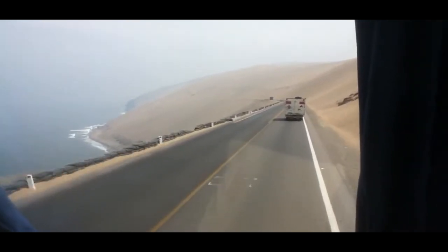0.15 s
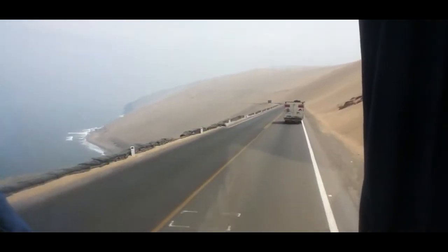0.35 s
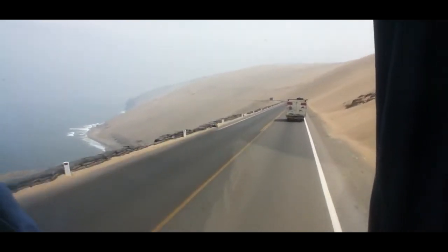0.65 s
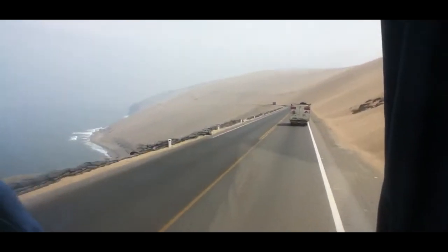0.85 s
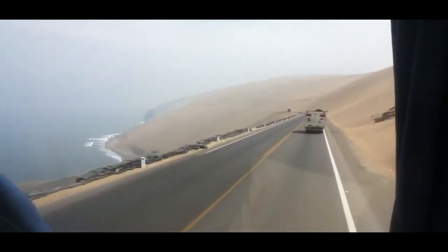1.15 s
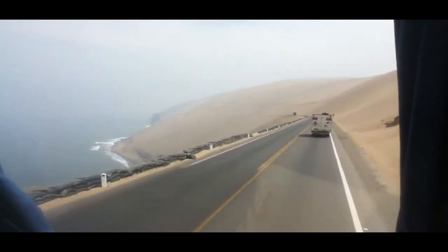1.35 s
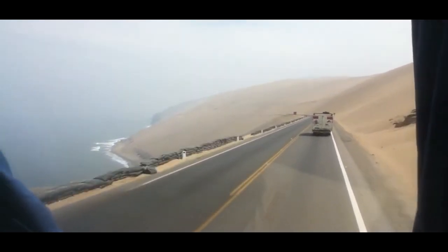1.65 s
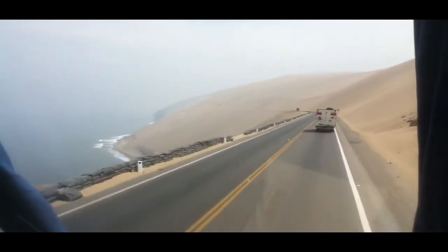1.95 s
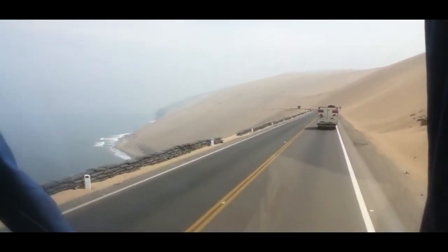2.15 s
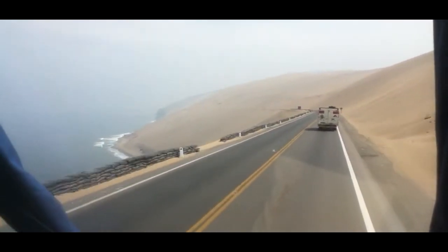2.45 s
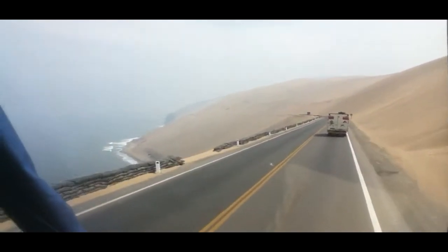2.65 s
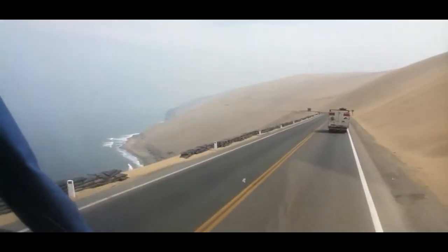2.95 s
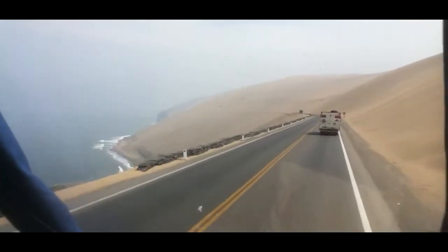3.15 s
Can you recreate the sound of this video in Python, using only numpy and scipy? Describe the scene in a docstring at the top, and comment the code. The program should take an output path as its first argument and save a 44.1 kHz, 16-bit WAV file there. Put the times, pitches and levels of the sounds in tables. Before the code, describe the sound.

A low, steady road rumble fills a moving bus, heard from a front seat. Loose fittings clack and a panel knocks nearby, then bumps make the cabin boom, over tyre and wind roar and a faint engine hum.

```python
"""A low road rumble fills the cabin of a bus cruising along a coast road, heard from a front seat.
Tyres and wind rumble through the body, and bumps set the cabin booming. The engine hums underneath,
with a drivetrain whine that creeps up in pitch as the bus gains speed. Around the microphone,
loose fittings clack, chatter and snap and a panel knocks as the road shakes them."""
import sys
import numpy as np
from scipy.fft import rfft, irfft, next_fast_len
from scipy.io import wavfile
from scipy.ndimage import map_coordinates

SR = 44100
rng = np.random.default_rng(int(sys.argv[2]) if len(sys.argv) > 2 else 0)


def to_wav(sig):
    """Store sig (one row per channel, or 1-D mono) as 16-bit WAV at the path in sys.argv[1].

    Samples outside -1..1 are clipped; the rate is SR.
    """
    pcm = np.clip(np.atleast_2d(sig), -1, 1) * 32767
    pcm = np.round(pcm).astype(np.int16)
    wavfile.write(sys.argv[1], SR, pcm.T)  # frames by channels


N = 145530


def amp(db):
    """Decibels to gain."""
    return 10 ** (np.asarray(db) / 20)


def unit(x):
    """Scale to rms 1."""
    return x / np.sqrt(np.mean(x ** 2) + 1e-20)


def curve(rows):
    """One value per sample from (s, value) rows."""
    return np.interp(np.arange(N) / SR, *np.transpose(rows))


def wobble(rate):
    """A smooth random curve, rate knots a second."""
    return map_coordinates(rng.standard_normal(int(N * rate / SR) + 4), [np.arange(N) * rate / SR])


def filtered(x, response):
    """x times a response of frequency."""
    m = next_fast_len(N + 8192)
    return irfft(rfft(x, m) * response(np.fft.rfftfreq(m, 1 / SR)), m)[:N]


def noise(spectrum, resonances=()):
    """Noise of rms 1 with a broad colour and narrow resonances on top."""
    f, db = np.transpose(spectrum)
    colour = lambda hz: np.interp(np.log(hz + 1), np.log(f + 1), db)
    lift = lambda hz: sum(d / (1 + (2 * (hz - c) / w) ** 2) for c, w, d in resonances)
    return unit(filtered(rng.standard_normal(N), lambda hz: amp(colour(hz) + lift(hz))))


def blow(start, rise, t60):
    """Envelope of a blow: quick rise, exponential decay."""
    t = np.maximum(np.arange(N) / SR - start, 0)
    return (1 - np.exp(-t / rise)) * np.exp(-np.minimum(np.log(1000) * t / t60, 20))


# drivetrain whine, following the engine speed: time_s, pitch_hz
WHINE_PITCH_CURVE = [(0, 232.5), (.65, 233.2), (.9, 234.1), (1.4, 234.1), (1.7, 235.1), (2.2, 235.8),
                     (2.5, 236.7), (2.85, 236.7), (3.3, 237.8)]
# partials of the whine: harmonic_number, level_db
WHINE_PARTIALS = [(1, -41.5), (2, -47)]
# engine hum at the seat: time_s, level_db
HUM_LEVELS = [(0, -32), (.9, -39), (1.25, -46), (1.9, -61), (2.25, -32), (2.7, -33), (3.0, -39), (3.3, -37)]

def engine(hum_ratio=.294, waver_db=1.5, waver_per_s=4):
    """Engine hum and drivetrain whine rise in pitch together with the speed, each wavering in level."""
    whine_cycles = np.cumsum(curve(WHINE_PITCH_CURVE)) / SR

    def tone(ratio):
        waver = amp(waver_db * wobble(waver_per_s))
        return unit(waver * np.sin(2 * np.pi * (ratio * whine_cycles + rng.random())))

    hum = amp(curve(HUM_LEVELS)) * tone(hum_ratio)
    whine = sum(amp(db) * tone(harmonic) for harmonic, db in WHINE_PARTIALS)
    return hum + whine


# loose fittings striking around the cabin: start_s, click_db, knock_db, t60_s
FITTING_CLACKS = [(0.061, -43, -45, 0.078), (0.066, -50, -41, 0.14), (0.128, -50, -57, 0.025),
                  (.199, -49.5, -60, .03), (.298, -48, -44, 0.028), (0.5, -48, -49, 0.051),
                  (0.531, -47.5, -64, 0.12), (0.565, -55, -44, 0.06), (0.778, -51, -51, 0.11),
                  (0.83, -48, -54, 0.026), (.871, -53, -66, 0.093), (0.895, -38, -36, 0.041),
                  (0.902, -38.5, -36.5, 0.092), (1.027, -41.5, -43, 0.11), (1.066, -35.5, -57, 0.053),
                  (1.070, -43.5, -59, 0.12), (1.288, -48, -57, .05), (1.33, -48.5, -39, 0.12),
                  (1.456, -55, -41, 0.15), (1.934, -47, -60, .06), (1.974, -44.5, -47, .06),
                  (2.445, -45, -60, 0.064), (2.4515, -42, -35.5, 0.075), (2.648, -54, -43, .05),
                  (2.826, -51, -64, .06), (2.9965, -40.5, -35, 0.06)]
# colour of a clack's sharp click: frequency_hz, relative_db
CLICK_SPECTRUM = [(600, -18), (2000, -1), (3300, 1.5), (4400, 0.5), (5500, 0), (7500, -2), (10000, -2.5),
                  (12500, -13)]
# colour of its hollow knock: frequency_hz, relative_db
KNOCK_SPECTRUM = [(200, -46), (500, 0), (1100, 2), (1700, -1), (2600, -3.5), (4000, -11), (9000, -70)]
# resonances of the fittings, also heard in the snaps: centre_hz, width_hz, lift_db
FITTING_RESONANCES = [(1040, 230, 6), (1710, 520, 3), (2510, 290, -2.5), (5320, 780, 1.5), (7000, 240, 1.5)]
# fittings rubbing: middle_s, half_length_s, level_db
FITTING_SCUFFS = [(0.383, 0.028, -57), (0.952, 0.019, -53), (1.014, 0.018, -56.5), (1.96, 0.024, -57),
                  (2.91, 0.014, -59)]

def rattles(rise_s=.0012, chatter_db=1.5, chatter_per_s=430, ticks_per_s=9):
    """Loose fittings strike, chatter briefly and rub; the trim ticks faintly at random."""
    t = np.arange(N) / SR
    bright = noise(CLICK_SPECTRUM, FITTING_RESONANCES)
    hollow = noise(KNOCK_SPECTRUM, FITTING_RESONANCES)
    chatter = unit(amp(chatter_db * wobble(chatter_per_s)))
    click_power, knock_power = np.zeros(N), np.zeros(N)
    for start, click_db, knock_db, t60 in FITTING_CLACKS:
        strike = blow(start, rise_s, t60)
        click_power += (amp(click_db) * strike) ** 2
        knock_power += (amp(knock_db) * strike) ** 2
    for middle, half_length, db in FITTING_SCUFFS:
        click_power += amp(db) ** 2 * np.exp(-((t - middle) / half_length) ** 2)
    for when, softness in rng.random((int(ticks_per_s * N / SR), 2)):
        tick_db = -63 - 2 * np.log(softness + 0.21)  # many faint ticks, a few stronger
        click_power += (amp(tick_db) * blow(when * N / SR, rise_s, t60=.05)) ** 2
    return chatter * (np.sqrt(click_power) * bright + np.sqrt(knock_power) * hollow)


# snaps inside the hardest clacks: start_s, level_db
CATCH_SNAPS = [(0.062, -39), (1.976, -40), (2.4538, -28.5), (2.4572, -33), (2.996, -31)]
# their colour: frequency_hz, relative_db
SNAP_SPECTRUM = [(400, -15), (1300, -5), (3300, 16.5), (4400, -4), (5500, 15), (6600, 3), (8000, -48),
                 (12500, -38)]

def snaps():
    """A hard catch snaps home with a dry, bright ring."""
    envelope = sum(amp(db) * blow(start, rise=.00043, t60=.016) for start, db in CATCH_SNAPS)
    return envelope * noise(SNAP_SPECTRUM, FITTING_RESONANCES)


# a loose panel knocking in the cabin: start_s, level_db, rise_s, t60_s
PANEL_STRIKES = [(.065, -39, .001, .03), (.383, -31, .005, .06), (.674, -32, .005, .05),
                 (.903, -21.5, .0012, .03), (1.331, -35, .002, .05)]
# its modes: pitch_hz, relative_db
PANEL_MODES = [(1090, -4.5), (1215, -4.5), (1660, -16), (2510, -13)]

def panel(pitch_spread=.015):
    """A loose panel rings briefly in its few modes, their pitches shifting a little at each knock."""
    t = np.arange(N) / SR
    knocks = np.zeros(N)
    for start, db, rise, t60 in PANEL_STRIKES:
        strike = blow(start, rise, t60)
        for mode_hz, mode_db in PANEL_MODES:
            pitch_hz = mode_hz * (1 + rng.normal(0, pitch_spread))
            knocks += amp(db + mode_db) * strike * np.sin(2 * np.pi * (pitch_hz * t + rng.random()))
    return knocks


# cabin booms on bumps in the road: start_s, level_db, pitch_hz
CABIN_BOOMS = [(0.858, -18.5, 81.5), (1.592, -11, 75), (1.867, -16, 96), (2.17, -9, 73.4),
               (2.638, -15, 74.5)]

def bumps(rise_s=.018, t60_s=.17):
    """Each bump sets the cabin around the microphone booming for a few cycles."""
    t = np.arange(N) / SR
    return sum(amp(db) * blow(start, rise_s, t60_s) * np.sin(2 * np.pi * hz * (t - start))
               for start, db, hz in CABIN_BOOMS)


# deep shudder of the bus body: time_s, level_db
SHUDDER_LEVELS = [(0, -34.5), (.4, -37), (.55, -29.5), (.9, -37), (1.1, -38.5), (1.45, -35), (1.7, -34.5),
                  (2.05, -39), (2.45, -36), (2.7, -30.5), (2.93, -46), (3.2, -42), (3.3, -22.5)]
# its colour: frequency_hz, relative_db
SHUDDER_SPECTRUM = [(8, -30), (17, -9), (28, -9), (36, -10), (43.5, 1), (52, -5.5), (70, -17), (110, -54),
                    (300, -120)]
# road rumble at the seat: time_s, relative_db
RUMBLE_LEVELS = [(0, -25), (.2, -25), (.42, -28), (.87, -24), (1.1, -26.5), (1.6, -26.5), (1.8, -25),
                 (1.87, -23), (1.98, -29), (2.03, -26), (2.25, -24), (2.52, -27), (2.58, -28),
                 (2.63, -25.5), (2.85, -24.5), (3.1, -29), (3.2, -24.5), (3.3, -30)]
# its colour: frequency_hz, relative_db
RUMBLE_SPECTRUM = [(20, -45), (45, -32), (60, -4.5), (73, 0.5), (100, -2), (125, -6), (155, -6.5),
                   (195, -10), (228, -7.5), (255, -12.5), (290, -22), (450, -40.5), (1000, -120)]
# cabin resonances lifting the rumble: centre_hz, width_hz, lift_db
CABIN_RESONANCES = [(76.5, 19, 1), (98, 34, 2.5), (134.2, 13.6, 5.5), (179, 5.3, 3.5), (202, 5.2, 4.5),
                    (275, 11, 4)]
# roar of tyres and wind, heard from inside: time_s, level_db
ROAR_LEVELS = [(0, -38.5), (.6, -39), (.92, -38.5), (1.2, -39), (2.0, -38.5), (2.6, -38), (3.3, -39.5)]
# its colour: frequency_hz, relative_db
ROAR_SPECTRUM = [(150, -46), (290, -2), (380, 2), (520, -2), (660, -3.5), (850, -8.5), (1100, -10),
                 (1400, -14), (1700, -16), (2500, -23), (4000, -29), (9000, -37.5)]
# thin hiss of air: frequency_hz, relative_db
HISS_SPECTRUM = [(1000, 22), (2500, 6), (3900, 7), (4600, 3.5), (5600, 11), (7500, 7), (10000, 1),
                 (12500, -40)]

def road(rumble_trim_db=-0.56, flutter_db=0.62, hiss_db=-60.5):
    """Tyres and wind reach the seat through the body as shudder, rumble, roar and a thin hiss."""
    shudder = amp(curve(SHUDDER_LEVELS)) * noise(SHUDDER_SPECTRUM)
    rumble = amp(curve(RUMBLE_LEVELS) + rumble_trim_db) * noise(RUMBLE_SPECTRUM, CABIN_RESONANCES)
    roar = amp(curve(ROAR_LEVELS) + flutter_db * wobble(rate=25.33)) * noise(ROAR_SPECTRUM)
    hiss = amp(hiss_db + 0.57 * wobble(rate=6.9)) * noise(HISS_SPECTRUM)
    return shudder + rumble + roar + hiss


def scene(rattle_gain_db=2):
    """The cabin from one microphone at a front seat."""
    return (engine() + road() + bumps() + panel() + snaps() + amp(rattle_gain_db) * rattles())[None]


def record(dry, top_hz=12480):
    """The microphone keeps nothing above its band limit."""
    return np.array([filtered(channel, lambda hz: hz < top_hz) for channel in dry])


dry = scene()
out = record(dry)
to_wav(out)
```